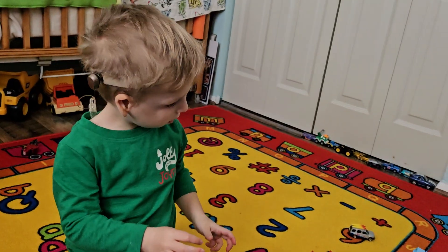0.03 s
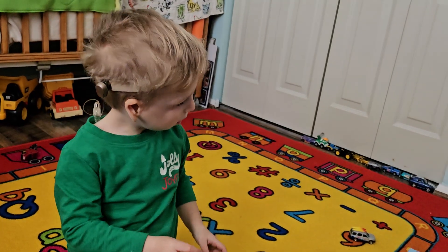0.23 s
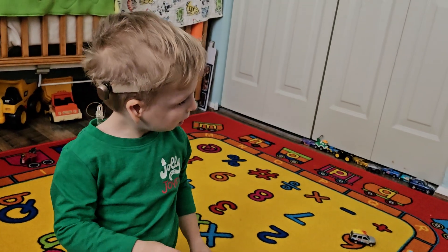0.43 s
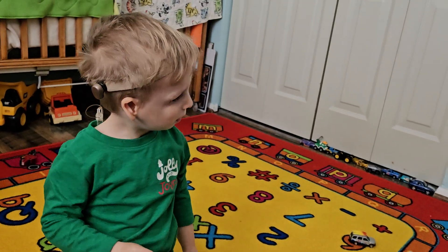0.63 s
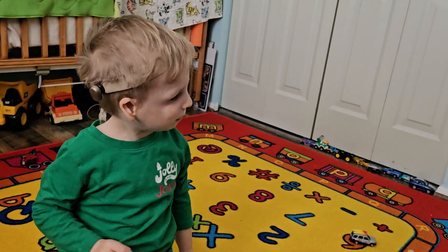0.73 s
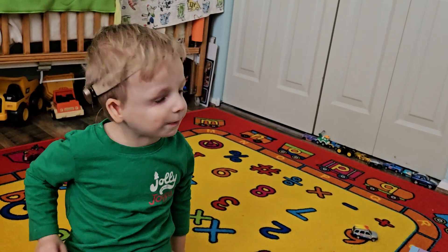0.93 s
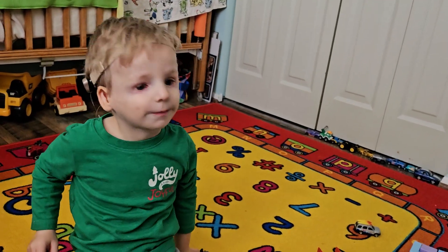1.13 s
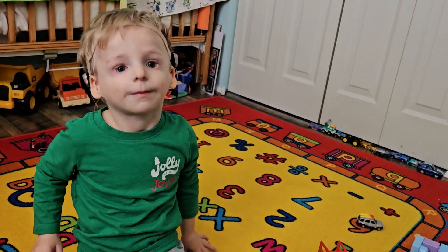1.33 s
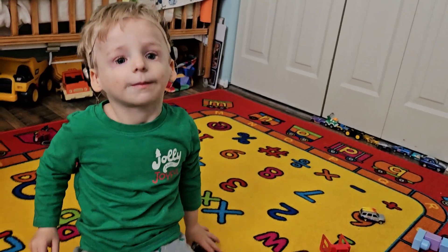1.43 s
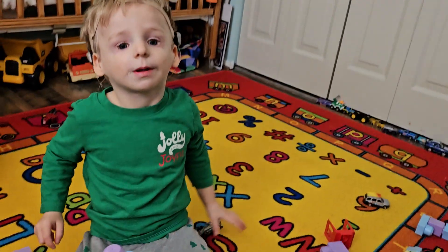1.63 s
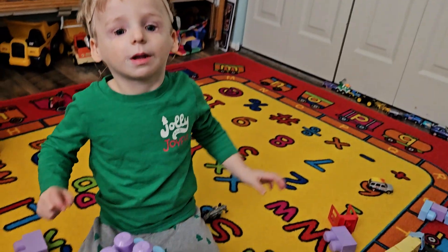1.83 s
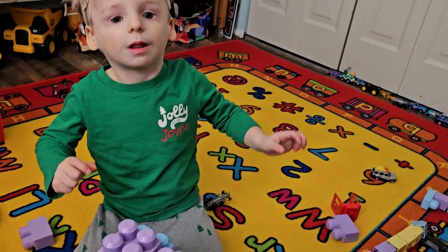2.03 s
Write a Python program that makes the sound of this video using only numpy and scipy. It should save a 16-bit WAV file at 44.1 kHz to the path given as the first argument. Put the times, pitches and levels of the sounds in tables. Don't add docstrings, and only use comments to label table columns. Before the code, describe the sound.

A quick, bright clatter of chunky plastic toy blocks falling on carpet, then near quiet

```python
import sys
import numpy as np
from scipy import signal
from scipy.fft import rfft, irfft, next_fast_len
from scipy.io import wavfile
from scipy.ndimage import map_coordinates

SR = 44100
rng = np.random.default_rng(int(sys.argv[2]) if len(sys.argv) > 2 else 0)


def linear_from_db(decibels):
    return 10 ** (np.asarray(decibels, float) / 20)


def bounce(signal):
    frames = np.transpose(np.atleast_2d(signal))
    limited = np.clip(frames, -1, 1)
    pcm = np.round(limited * 32767).astype(np.int16)
    wavfile.write(sys.argv[1], SR, pcm)


N = 91331
HALVES = np.array([[0.5], [-0.5]])


def unit(x):
    return x / np.sqrt(np.mean(x ** 2) + 1e-20)


def along(points, hz):
    f, v = np.transpose(points)
    return np.interp(np.log(hz + 1), np.log(f + 1), v)


def curve(rows):
    return np.interp(np.arange(N) / SR, *np.transpose(rows))


def wobble(rate):
    knots = rng.standard_normal(int(N * rate / SR) + 4)
    return map_coordinates(knots, [np.arange(N) * rate / SR])


def filtered(x, response):
    m = next_fast_len(N + SR // 2)
    return irfft(rfft(x, m) * response(np.fft.rfftfreq(m, 1 / SR)), m)[..., :N]


def coloured(x, points):
    return unit(filtered(x, lambda hz: linear_from_db(along(points, hz))))


def causal(points, lift_db):
    def response(hz):
        c = irfft((along(points, hz) + lift_db) * np.log(10) / 20)
        c[1:len(c) // 2] *= 2
        c[len(c) // 2 + 1:] = 0
        return np.exp(rfft(c))
    return response


def body(modes, widen):
    def response(f):
        total = 0
        for k, (centre, width, db) in enumerate(modes):
            damping = 1j * f * width * widen
            total = total + (-1) ** k * linear_from_db(db) * damping / (centre ** 2 - f ** 2 + damping)
        return total
    return response


def mix_alike(a, b, alike, hz):
    turn = np.arccos(np.clip(along(alike, hz), -1, 1)) / 2
    turn = turn.reshape((-1,) + (1,) * (a.ndim - 1))
    mid, side = a * np.cos(turn), b * np.sin(turn)
    return np.array([mid + side, mid - side])


def pair(alike):
    m = next_fast_len(N + SR // 2)
    a, b = rfft(rng.standard_normal((2, N)), m)
    return irfft(mix_alike(a, b, alike, np.fft.rfftfreq(m, 1 / SR)), m)[:, :N]


def ports(x, lag_s):
    return filtered(x, lambda hz: np.exp(-2j * np.pi * hz * lag_s * HALVES))


# (frequency [Hz], level [dB per Hz])
MIC_COLOUR = [(1500, -3), (9500, -10), (13500, 3.5), (16000, -11)]


def microphone_hiss():
    return linear_from_db(-79) * coloured(rng.standard_normal((2, N)), MIC_COLOUR)


# (frequency [Hz], level [dB per Hz])
RUMBLE_COLOUR = [(15, -39), (25, -23.5), (43, -4.5), (184, -13), (250, -5), (320, -31.5), (550, -120)]


def house_rumble():
    return linear_from_db(-65) * coloured(pair([(60, 0.5)]), RUMBLE_COLOUR)


# (frequency [Hz], level [dB per Hz])
CLOTH_COLOUR = [(1060, -27.5), (2500, -12), (5000, -16), (5800, -17), (6700, -14), (7800, -15), (9000, -16),
                (11000, -26)]
# (time [s], level [dB])
CLOTH_LEVEL = [(0, -63.5), (.6, -77.5), (.76, -73), (.88, -83.5), (.96, -71), (1.03, -89.5), (1.15, -76.5),
               (1.23, -81), (1.4, -70.5), (1.55, -64), (1.68, -77.5), (1.82, -71), (1.92, -75),
               (2.07, -77.5)]


def cloth():
    return linear_from_db(curve(CLOTH_LEVEL)) * coloured(rng.standard_normal((2, N)), CLOTH_COLOUR)


# (time [s], peak level [dB], frequency [Hz], time to fall 60 dB [s])
TICKS = [(0.019, -60.5, 10900, .01), (0.753, -68.5, 3360, 0.06), (0.943, -68, 4430, 0.04),
         (1.066, -51, 800, 0.034), (1.451, -59, 7500, .014), (1.452, -61, 13500, 0.016),
         (1.454, -58, 2630, 0.017), (1.4526, -57, 4830, 0.012), (1.714, -62.5, 7400, 0.018),
         (1.7877, -60.5, 9000, 0.016), (1.802, -52, 2090, 0.021), (1.818, -54.5, 1900, .03),
         (1.84, -46.5, 2480, 0.011), (1.8395, -52, 3700, 0.0084)]


def ticks():
    resonance_q, lean_db = 2.79, 8
    out, t = np.zeros((2, N)), np.arange(SR // 15) / SR
    for s, db, hz, t60 in TICKS:
        b, a = signal.iirpeak(hz, resonance_q, SR)
        puff = signal.lfilter(b, a, rng.standard_normal(len(t)))
        puff = unit(signal.lfilter(b, a, puff))
        click = linear_from_db(db - 60 * t / t60) * puff
        at = round(s * SR)
        out[:, at:at + len(t)] += click * linear_from_db(lean_db * HALVES)
    return out


# (time [s], level [dB])
TRUNDLE_LEVEL = [(0, -61.5), (.6, -42), (.76, -54.5), (.83, -53), (1.02, -53.5), (1.15, -50), (1.24, -53),
                 (1.41, -52.5), (1.45, -49.5), (1.56, -50.5), (1.69, -51.5), (1.72, -51), (1.87, -47.5),
                 (1.94, -54), (2.0, -43.5), (2.07, -51)]
# (frequency [Hz], width [Hz], level [dB])
TRUNDLE_BODY = [(285.6, 36, -2), (446.5, 27.5, -3), (580, 47, -11.5), (778, 48, -3), (1090, 44, -18),
                (1500, 68, -12)]
# (frequency [Hz], level [dB per Hz])
TRUNDLE_WASH = [(88, -40.5), (150, -6.5), (441, -27.5), (487, -24), (775, -1), (3000, -43.5), (3900, -59),
                (6600, -120)]
# (frequency [Hz], likeness [0 to 1])
TRUNDLE_ALIKE = [(60, 0.45), (240, 1), (950, 0.28), (3770, 0.11), (15000, 0.045)]


def trundle():
    lump_db, lumps_per_s, wash_db = 2, 45.52, -7
    drive = linear_from_db(lump_db * wobble(lumps_per_s)) * pair(TRUNDLE_ALIKE)
    wash = coloured(drive, TRUNDLE_WASH)
    hollow = unit(filtered(drive, body(TRUNDLE_BODY, 1.0)))
    return linear_from_db(curve(TRUNDLE_LEVEL)) * unit(hollow + linear_from_db(wash_db) * wash)


# (frequency [Hz], time to fall 60 dB [s])
ROOM_T60 = [(100, 0.89), (500, 0.24), (2000, 0.26), (6000, 0.23), (15000, 0.18)]
# (frequency [Hz], likeness [0 to 1])
ROOM_ALIKE = [(100, 1), (400, 0.82), (1000, 0.056), (8000, 0.072)]


def room(x):
    out, step, delay = np.zeros((2, N)), SR // 20, 130
    for at in range(0, SR * 3 // 4, step):
        hz, t, z = signal.stft(rng.standard_normal((2, SR // 2)), SR, nperseg=256)
        fade = linear_from_db(-60 * t / along(ROOM_T60, hz)[:, None])
        tail = signal.istft(mix_alike(z[0], z[1], ROOM_ALIKE, hz) * fade, SR, nperseg=256)[1]
        tail = tail / np.linalg.norm(tail[0])
        wet = signal.fftconvolve(x[None, at:at + step], tail, axes=1)
        out[:, at + delay:][:, :wet.shape[1]] += wet
    return out


# (time [s], peak level [dB], frequency [Hz], time to fall 60 dB [s])
THUDS = [(0.01, -37, 107, 0.11), (.058, -19, 411, 0.073), (0.059, -18.5, 198.7, 0.13),
         (.063, -19, 302, 0.077), (0.062, -37, 92.8, 0.62), (.082, -20.5, 680, 0.037),
         (.129, -24, 813, 0.026), (0.158, -26.5, 426, 0.064), (0.2093, -12, 467.4, 0.047),
         (.214, -17.5, 670, 0.057), (0.243, -7, 484, 0.0097), (0.276, -35.5, 554, 0.011),
         (.287, -17, 1240, 0.023), (0.333, -9, 469, 0.018), (.340, -11.5, 795, 0.0087),
         (0.364, -20, 545, 0.034), (0.37, -22.5, 196, 0.016), (.411, -29, 605, 0.028),
         (.427, -28.5, 536, 0.033), (.451, -19, 299, 0.035), (.452, -25.5, 430, 0.032),
         (.457, -6.5, 737, 0.0069), (0.541, -24, 400.2, 0.016), (.548, -18.5, 833, 0.016),
         (0.568, -38, 190, 0.062), (.572, -25, 769, 0.044), (0.589, -33.5, 300, 0.025),
         (.61, -31.5, 660, 0.024), (.677, -40, 780, 0.051), (.66, -38.5, 1510, 0.07),
         (.11, -36.5, 427, 0.15), (.224, -12.5, 496, .03), (.13, -42.5, 75, .2), (0.252, -42, 78, 0.12)]


def thuds():
    out, t = np.zeros(N), np.arange(SR // 5) / SR
    rise = 1 - np.exp(-t / 0.00056)
    for s, db, hz, t60 in THUDS:
        at = round(s * SR)
        out[at:at + len(t)] += linear_from_db(db - 60 * t / t60) * rise * np.sin(2 * np.pi * hz * t)
    return out


# (time [s], peak level [dB], loudest wall mode [Hz], treble of the crack [dB])
HITS = [(0.0559, -48.5, 3320, -6), (0.059, -9, 4130, -2.5), (0.0677, -14, 1390, -15),
        (0.0780, -9, 3720, -4.5), (0.0834, -16, 3330, 0.5), (0.0867, -20.5, 3570, -1.5),
        (0.096, -12.5, 2050, 3), (0.1022, -19, 3410, 0), (0.112, -28, 1080, -7), (0.123, -26.5, 3720, -10),
        (0.139, -21.5, 3950, -9), (0.156, -16, 4500, -17), (0.195, -11.5, 2160, -5.5),
        (0.2033, -8.5, 1490, -6), (0.2093, -7, 1924, -4), (0.2122, -11.5, 3930, -1.5),
        (.2172, -4.5, 1490, 2), (0.2257, -10, 4220, 2), (0.2317, -10, 3070, 2), (0.2353, -11, 3380, -14),
        (0.2437, -20, 3930, -3), (0.2489, -19, 4890, -9), (0.2566, -16.5, 3070, -5),
        (.2660, -13.5, 2695, -2), (0.2793, -18, 2170, -14), (.293, -32, 2900, -8.5),
        (0.334, -13.5, 2200, -18), (0.3396, -9, 1565, 2), (0.3487, -13.5, 2130, 2), (0.3527, -16, 1430, -5),
        (0.358, -20, 4520, -6.5), (.364, -17, 3970, -5), (0.368, -32.5, 2130, -7.5),
        (0.3795, -30.5, 3970, -10), (.4115, -34, 3770, -7.5), (0.4513, -16, 4400, -12.5),
        (.4590, -12, 3853, 2), (0.4677, -13.5, 2300, -6.5), (0.475, -20.5, 2470, -7.5),
        (0.5416, -23.5, 4600, -1), (0.5491, -20.5, 1500, 2), (.5565, -31, 4810, -5.5),
        (0.5643, -21, 4810, -3.5), (.573, -26, 2210, -6.5), (0.5806, -25.5, 4810, -9.5),
        (.590, -28.5, 4400, -6.5), (.599, -30, 2210, -3), (.614, -36, 4670, -9.5),
        (.6764, -44.5, 1430, -9.5), (.685, -51.5, 6360, -0.5)]
# (frequency [Hz], level [dB per Hz])
CRACK_COLOUR = [(120, -33.5), (200, -9), (465, -3), (950, 0), (3830, -4.5), (5520, -18.5), (16000, -20)]
CRACK_LIFT_DB = 18.7


def cracks():
    level_db, t60, rise_s, dull_hz = -12.5, 0.011, 0.00035, 5200
    parts, t = np.zeros((2, N)), np.arange(SR // 5) / SR
    shape = linear_from_db(level_db - 60 * t / t60) * (1 - np.exp(-t / rise_s))
    for s, db, _, treble_db in HITS:
        at = round(s * SR)
        gains = linear_from_db([[db], [db + min(treble_db, 2)]])
        parts[:, at:at + len(t)] += gains * rng.standard_normal(len(t)) * shape

    def split(hz):
        dull = 1 / (1 + 1j * hz / dull_hz) ** 2
        return np.array([dull, 1 - dull])
    return filtered(filtered(parts, split).sum(0), causal(CRACK_COLOUR, CRACK_LIFT_DB))


# (frequency [Hz], width [Hz], level [dB])
FIRST_WALLS = [(1080, 40, -3), (1390, 52, 0), (2050, 90, -10), (3330, 160, -11.5), (3720, 87, 4),
               (4130, 130, -1.5), (4740, 120, -11.5), (5830, 190, -7), (6630, 120, -7.5), (7540, 81, -15)]
# (frequency [Hz], width [Hz], level [dB])
SECOND_WALLS = [(1490, 36, -6), (2680, 150, 2), (3070, 68, -10), (3930, 140, -1.5), (4220, 38, -12),
                (4890, 44, -20), (5160, 120, -2), (6300, 69, -10), (6670, 29, -13), (7270, 130, -9.5),
                (8070, 110, -11)]
# (frequency [Hz], width [Hz], level [dB])
THIRD_WALLS = [(1522, 34, 5.5), (2300, 43, 2), (3157, 46, -12), (3600, 24, -6), (3734, 190, -5.5),
               (4520, 33, -5), (4820, 28, -17), (6300, 110, -19.5), (6960, 34, -25.5)]
# (frequency [Hz], width [Hz], level [dB])
FOURTH_WALLS = [(1030, 33, -10), (1510, 93, 5), (1845, 24, 4.5), (2210, 17, 6.5), (2390, 79, -10.5),
                (3970, 50, -6.5), (4810, 66, -15), (6360, 40.9, -8), (7920, 33, -18)]
BLOCKS = FIRST_WALLS, SECOND_WALLS, THIRD_WALLS, FOURTH_WALLS
NEXT_BLOCK = (.19, .33, .53)


def ring(modes, t):
    detune, out = 0.019, np.zeros(len(t))
    for hz, width, db in modes:
        strength, shift = rng.standard_normal(2)
        tone = np.sin(2 * np.pi * hz * (1 + detune * shift) * t)
        out += linear_from_db(db + strength) * tone * np.exp(-np.pi * (width + 40) * t)
    return out


def walls():
    walls_db, loudest_db, loudest_t60 = -14.5, -8.5, 0.018
    out, t = np.zeros(N), np.arange(SR // 5) / SR
    for s, db, hz, _ in HITS:
        at = round(s * SR)
        modes = BLOCKS[np.searchsorted(NEXT_BLOCK, s)]
        loudest = linear_from_db(loudest_db - 60 * t / loudest_t60) * np.sin(2 * np.pi * hz * t)
        out[at:at + len(t)] += linear_from_db(db) * (linear_from_db(walls_db) * ring(modes, t) + loudest)
    return out


def rattle():
    level_db, t60, rise_s = -10, 0.073, 0.0021
    knocks_per_s, spread_db, ring_db, widen = 1800, 4, 18, 6.3
    knocks, t = np.zeros((len(BLOCKS), 2, N)), np.arange(SR // 5) / SR
    for s, db, _, _ in HITS:
        at, size = round(s * SR), (2, len(t))
        happens = rng.random(size) < knocks_per_s / SR
        strength = linear_from_db(spread_db * rng.standard_normal(size)) * rng.standard_normal(size)
        fade = linear_from_db(db + level_db - 60 * t / t60) * (1 - np.exp(-t / rise_s))
        knocks[np.searchsorted(NEXT_BLOCK, s), :, at:at + len(t)] += fade * happens * strength
    rung = sum(filtered(k, body(modes, widen)) for k, modes in zip(knocks, BLOCKS))
    return filtered(knocks.sum(0), causal(CRACK_COLOUR, CRACK_LIFT_DB)) + linear_from_db(ring_db) * rung


# (frequency [Hz], difference [dB])
LEAN = [(60, 0), (240, -1), (950, 3.5), (3770, 5.5), (15000, 8)]


def scene():
    room_db, blocks_lag_s, trundle_lag_s = -7, 0.0002547, 0.0002
    background = microphone_hiss() + house_rumble() + cloth() + ticks()
    background = background + ports(trundle(), trundle_lag_s)
    direct, around = thuds() + cracks() + walls(), rattle()
    near = ports(direct, blocks_lag_s) + around + linear_from_db(room_db) * room(direct + around[0])
    return background + filtered(near, lambda hz: linear_from_db(along(LEAN, hz) * HALVES))


def band_limit(x):
    return signal.sosfilt(signal.butter(12, 16990, fs=SR, output="sos"), x)


# (frequency [Hz], level [dB])
PORT_COLOUR = [(5000, 0), (5650, 0), (6300, 5), (7300, 1), (8600, -3), (10000, 2.5), (13500, -0.5)]


def record(dry):
    low_hz, top_hz, ceiling, power = 65, 16000, 0.95, 4
    colour = causal(PORT_COLOUR, 0)
    x = filtered(dry, lambda hz: (1j * hz / (low_hz + 1j * hz)) ** 2 * colour(hz))
    x = x / (1 + np.abs(x / ceiling) ** power) ** (1 / power)
    mix = filtered(x, lambda hz: hz < top_hz)
    return band_limit(mix)


dry = scene()
out = record(dry)
bounce(out)
```